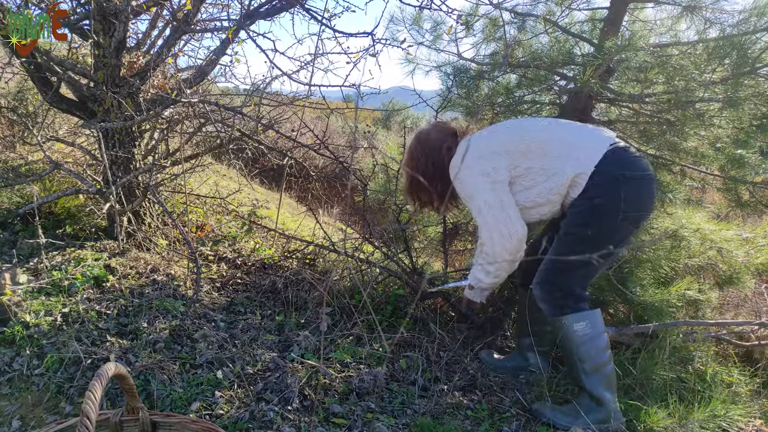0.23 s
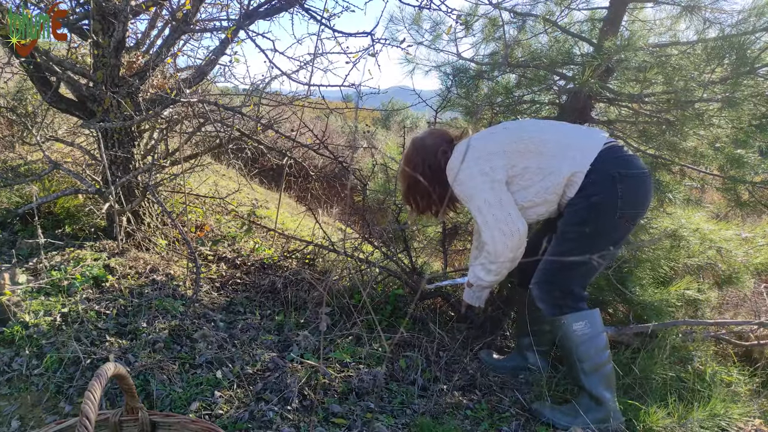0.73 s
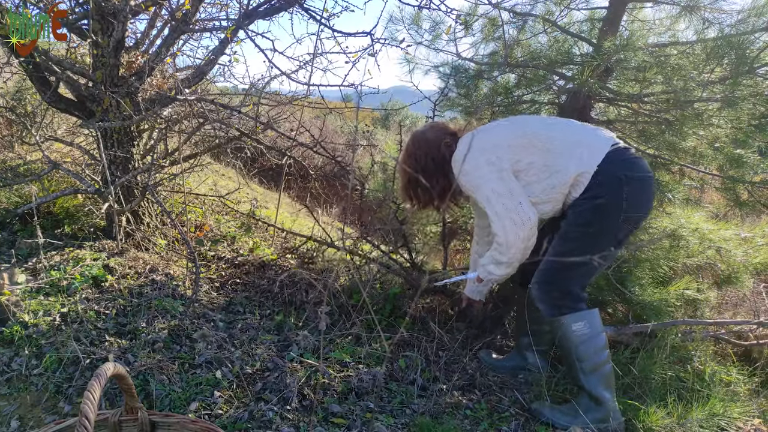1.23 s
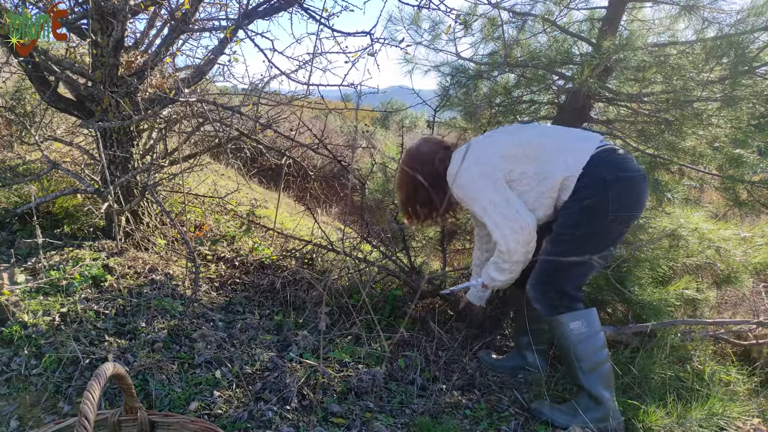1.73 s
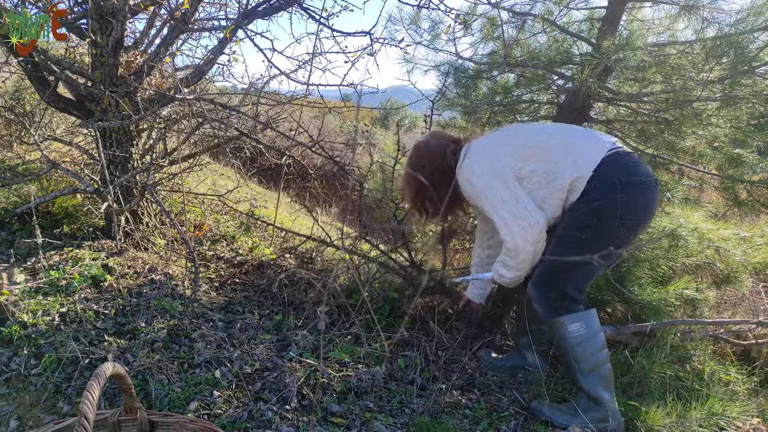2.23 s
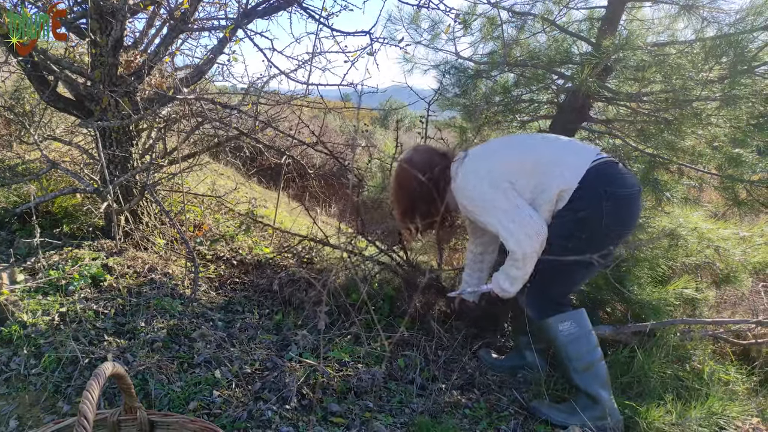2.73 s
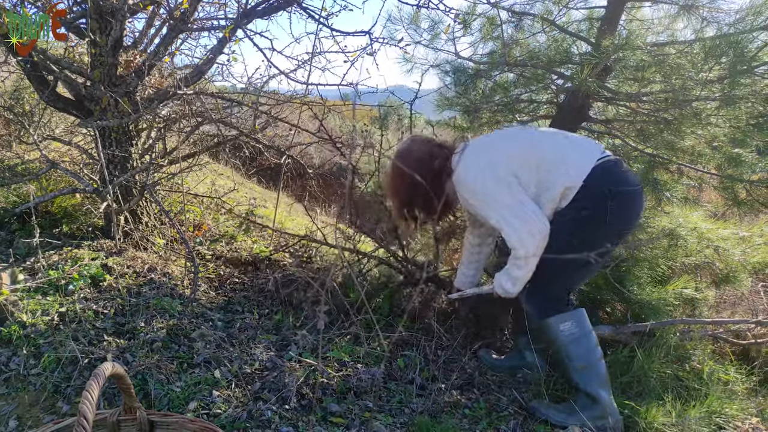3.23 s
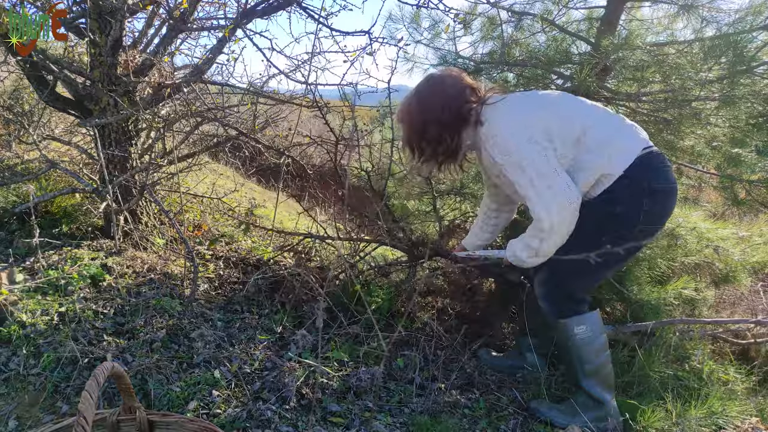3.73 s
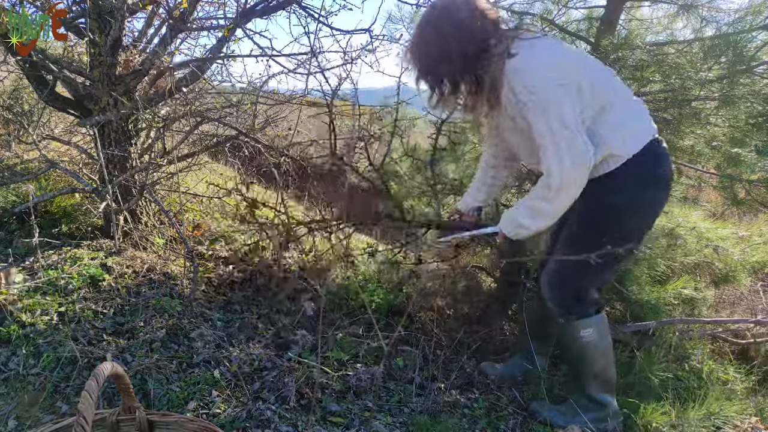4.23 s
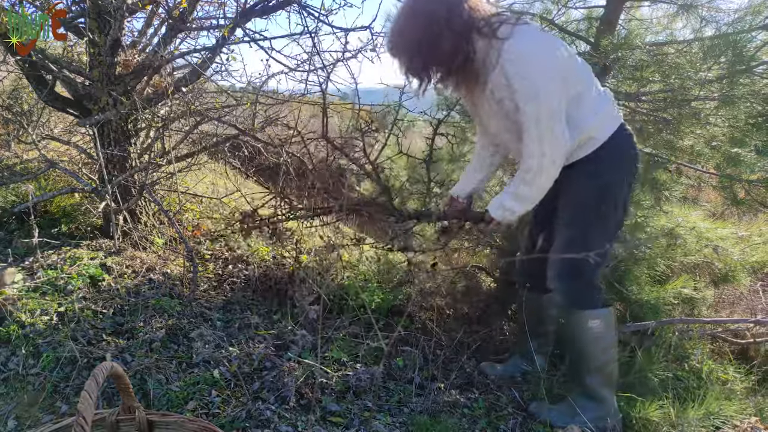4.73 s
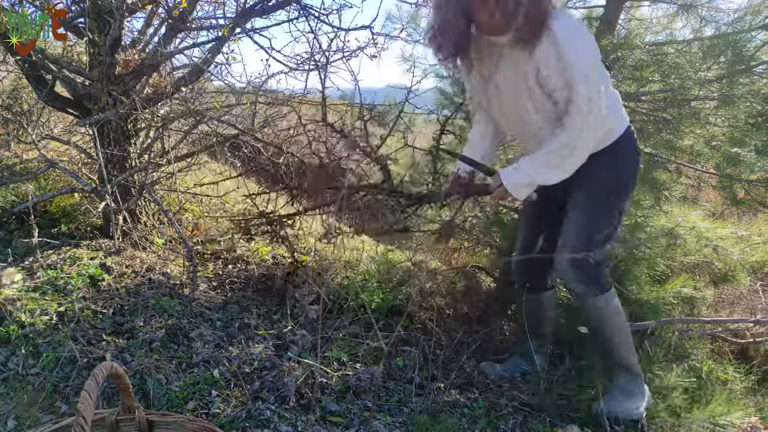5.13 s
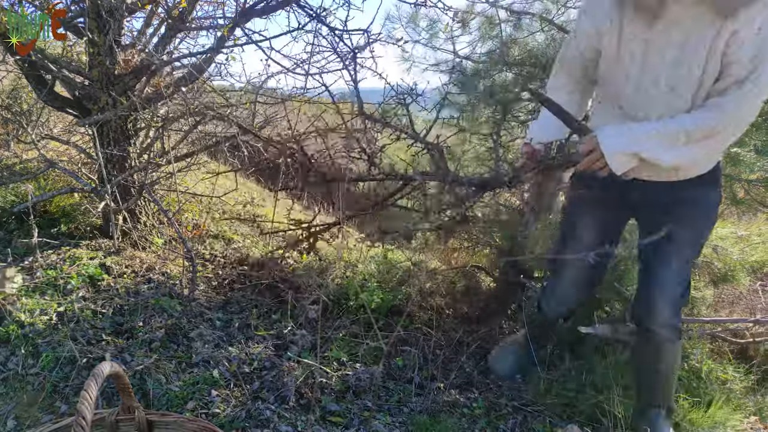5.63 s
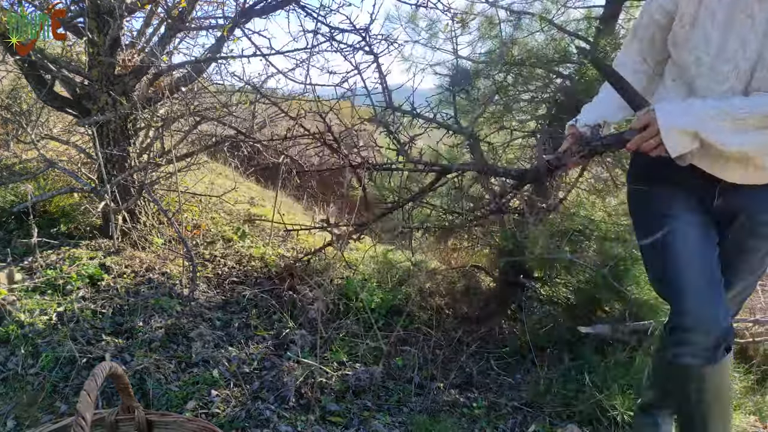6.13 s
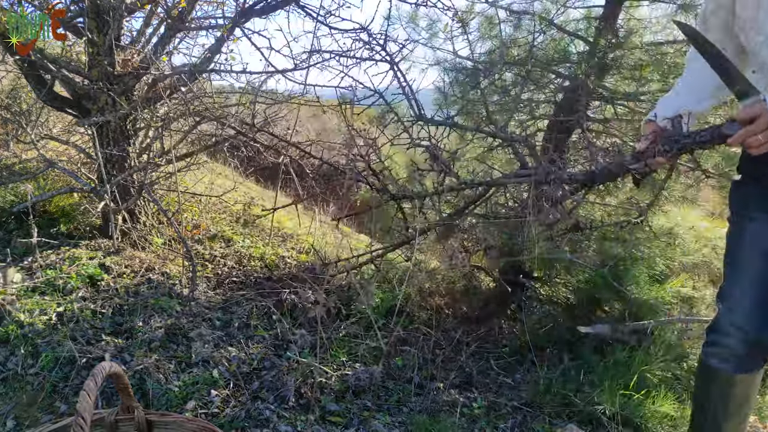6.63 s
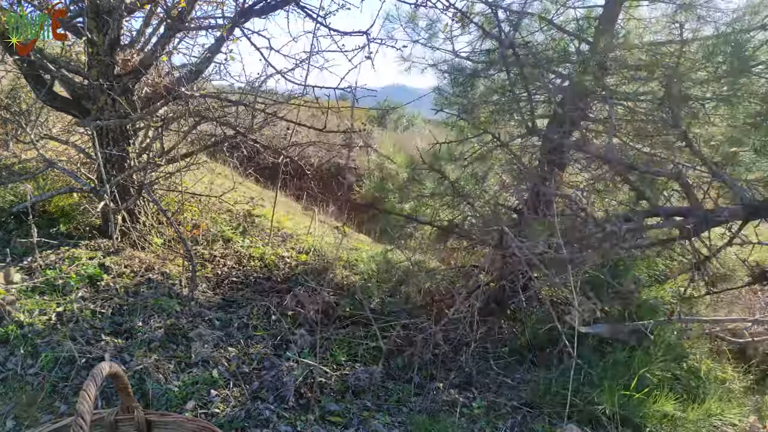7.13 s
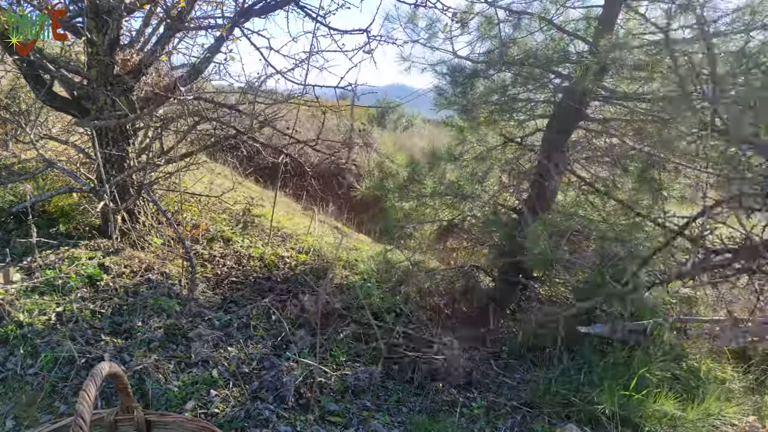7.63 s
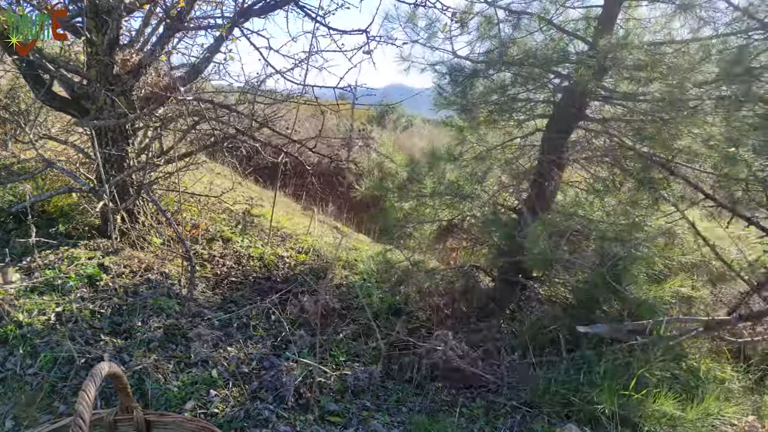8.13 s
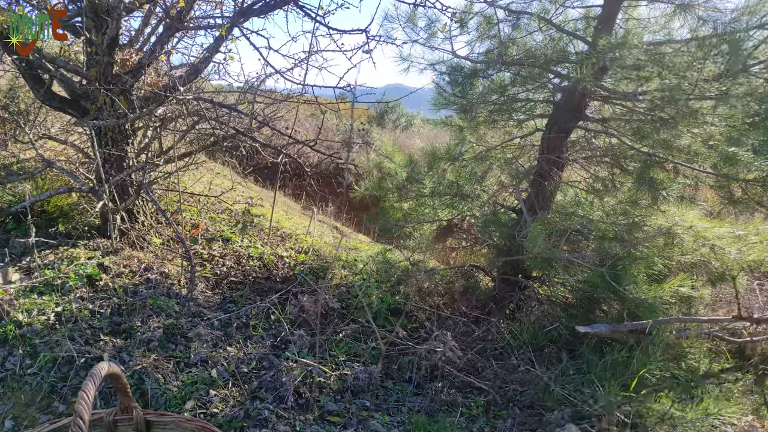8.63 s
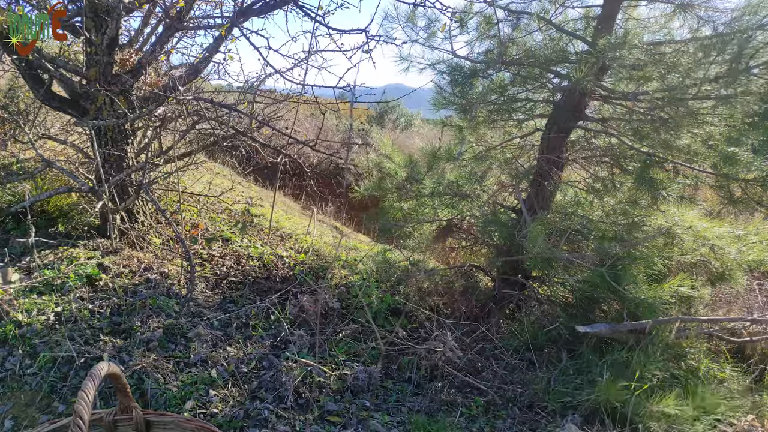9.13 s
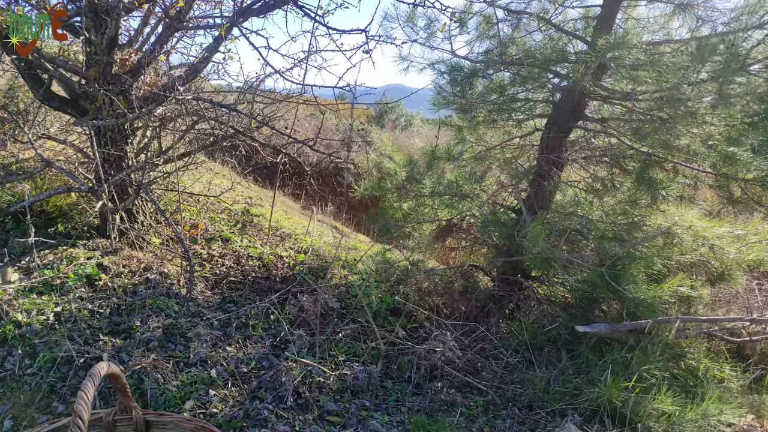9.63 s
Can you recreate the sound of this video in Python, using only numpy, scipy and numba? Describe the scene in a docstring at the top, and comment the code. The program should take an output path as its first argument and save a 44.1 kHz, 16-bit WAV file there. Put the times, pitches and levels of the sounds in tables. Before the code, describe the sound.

In a quiet open pine wood with faint low wind, a small bird ticks on the left while dry twigs rustle and snap softly. After three seconds a dead branch is pulled free with dense bright crackling, sharp snaps, wood knocks and boot thuds, dragged past a close stereo microphone, then thinning to near silence.

```python
"""Still air and slow wind in a quiet pine wood, with a faint dry rustle at the stereo microphone.
A dead branch is worked loose from brush and dragged off past it: chance cracks make the rustle, resonances
the snapping twigs, sagging sines and ringing noise the wood knocks and boot thuds. On the left a small bird
ticks in falling chirps; another whistles twice in thin sines. The microphone ports ring near 7 kHz."""
import sys
import numpy as np
from scipy import signal
from scipy.fft import rfft, irfft, next_fast_len
from scipy.io import wavfile
from scipy.ndimage import uniform_filter1d, map_coordinates
from numba import njit

SR = 44100
rng = np.random.default_rng(int(sys.argv[2]) if len(sys.argv) > 2 else 0)


def inscribe(sig):
    """Save sig as 16-bit PCM at rate SR to the path in sys.argv[1].

    A 1-D sig is mono; a 2-D sig holds one channel per row.
    Samples are clipped to [-1, 1] before scaling.
    """
    pcm = np.round(np.clip(np.atleast_2d(sig).T, -1, 1) * 32767)
    wavfile.write(sys.argv[1], SR, pcm.astype(np.int16))


N = 435266


def undb(db):
    """Decibels to gain."""
    return 10 ** (np.asarray(db) / 20)


def unit(x):
    """Scale to rms 1 over all channels together."""
    return x / np.sqrt(np.mean(x ** 2))


def sides(db, pan_db):
    """Left and right gains for a level and a left minus right difference."""
    return undb([db + pan_db / 2, db - pan_db / 2])


def along(table, hz):
    """Read (frequency [Hz], value) points on a log-frequency axis."""
    points = np.array(table)
    return np.interp(np.log(hz + 1), np.log(points[:, 0]), points[:, 1])


def colour(x, table, lo_hz, hi_hz):
    """Filter to a spectrum of (Hz, dB) points between two soft edges; white noise keeps its rms."""
    size = next_fast_len(N)
    hz = np.arange(size // 2 + 1) * SR / size
    edges = np.sqrt((1 + (lo_hz / (hz + 1)) ** 8) * (1 + (hz / hi_hz) ** 8))
    gain = undb(along(table, hz)) / edges
    return irfft(rfft(x, size) * unit(gain), size)[..., :N]


def pair(table):
    """Two white noises, as alike left and right at each frequency as the table says."""
    size = next_fast_len(N)
    alike = np.clip(along(table, np.arange(size // 2 + 1) * SR / size), -1, 1)
    mid, side = rfft(rng.standard_normal((2, size))) * np.sqrt([(1 + alike) / 2, (1 - alike) / 2])
    return irfft([mid + side, mid - side], size)[:, :N]


def fade(x, t60):
    """Each impulse leaves an exponential tail that falls 60 dB in t60 seconds."""
    return signal.lfilter([1], [1, -np.exp(-np.log(1000) / (t60 * SR))], x)


def walk(rate):
    """Random levels of rms 1, held 1 / rate s and slewed twice."""
    hold = int(SR / rate)
    steps = np.repeat(rng.standard_normal(N // hold + 1), hold)
    return unit(uniform_filter1d(uniform_filter1d(steps, hold), hold)[:N])


def add(track, s, sound):
    """Mix a short sound in at s seconds."""
    i = int(s * SR)
    track[:, i:i + sound.shape[1]] += sound[:, :N - i]


def chance_db(draw, spread_db, most):
    """Chance levels above the smallest, most of them small, capped at most times the spread."""
    return np.minimum(-spread_db * np.log(1 - draw), most * spread_db)


def ring(x, hz, sharpness):
    """One resonance driven by x."""
    return signal.lfilter(*signal.iirpeak(hz, max(sharpness, .3), fs=SR), x)


def knell(t, hz, t60):
    """A mode struck at 1 ms, dying away exponentially."""
    return np.sin(2 * np.pi * hz * (t - .001)) * (t > .001) * undb(-60 * t / t60)


# Spectrum of the still air: (frequency [Hz], relative level [dB])
AIR_SPECTRUM = [(30, 0), (56, -5), (120, -10.5), (277, -13.5), (659, -22.5), (840, -22.5), (1020, -28.5),
                (3920, -31), (7310, -37), (8830, -35), (10700, -53), (16000, -49)]
AIR_DB, AIR_LOW_HZ = -66.5, 45


def still_air():
    """Still air in the pines: wide coloured noise whose level wanders slightly."""
    air = pair([(40, 0.25), (150, 0.5), (3000, 0.)])
    air = air * undb(1.2 * walk(3.2))
    return colour(air, AIR_SPECTRUM, AIR_LOW_HZ, SR) * sides(AIR_DB, 4.2)[:, None]


# Slow wind on the microphone ports, before its random wavering: (time [s], level [dB])
WIND_LEVELS = [(0, -61.5), (1.0, -62.5), (2.0, -57), (3.0, -56.5), (3.7, -59.5), (4.8, -65), (5.5, -61),
               (6.3, -58), (7.0, -64), (7.7, -63), (9.87, -61.5)]


def gusts():
    """Wind on the ports: very low noise, independent left and right, wavering in level."""
    rumble = colour(rng.standard_normal((2, N)), [(8, 5.5), (40, -10.0), (120, -25.5)], 9, 80)
    level_db = np.interp(np.arange(N) / SR, *np.transpose(WIND_LEVELS))
    return rumble * undb(4.1 * walk(5.2) + level_db) * sides(0, 4.9)[:, None]


def crackle(rate, spread_db, t60, scatter_db, patchy_db, hush):
    """Envelope of many cracks at chance moments and places: most small, a few large, over a blur of far ones."""
    moment, size, place = rng.random((3, N))
    size_db = chance_db(size, spread_db, 4)
    cracks = (moment < rate / SR) * sides(size_db, scatter_db * (2 * place - 1))
    return unit((unit(fade(cracks, t60)) + hush) * undb(patchy_db * walk(22)))


@njit
def grains(start, length, a, b, size, lag, count):
    """Each grain is a mode struck once; it reaches the left port lag samples after the right."""
    out = np.zeros((2, count + 2048))
    for k in range(len(start)):
        now, last = size[k], 0.
        for i in range(length[k]):
            out[0, start[k] + lag[k] + i] += now
            out[1, start[k] + i] += now
            now, last = a[k] * now - b[k] * last, now
    return out


def ticking(rate, spread_db, sharpness, count):
    """Lone twig ticks: every twig rings briefly at a pitch of its own, from its own direction."""
    when, size, loud, side = rng.random((int(rate * N / SR), 4)).T
    start = 8 + (when * (N - 8)).astype(int)
    hz = 1200 * 10 ** size
    sharp = np.maximum(sharpness * undb(5 * rng.standard_normal(len(hz))), 2)
    # neighbouring sizes of twig come and go together, nine times a second
    bunches = rng.standard_normal((count, 9 * N // SR))
    spots = [size * (count - 1), when * (bunches.shape[1] - 1)]
    bunch_db = 4.2 * map_coordinates(bunches, spots, order=1)
    gain = undb(bunch_db + chance_db(loud, spread_db, 3)) * hz / np.sqrt(sharp)
    # phase step and damping per sample
    step, damp = 2 * np.pi * hz / SR, np.pi * hz / sharp / SR
    length = np.minimum(6 / damp, 2000).astype(int)
    lag = (16 * side - 6).astype(int)
    a, b = 2 * np.exp(-damp) * np.cos(step), np.exp(-2 * damp)
    return unit(grains(start, length, a, b, gain * np.sin(step), lag, N)[:, :N])


def stray(rate, spread_db):
    """Lone sharp cracks at chance moments and sides."""
    when, loud, side = rng.random((int(rate * N / SR), 3)).T
    out, i = np.zeros((2, N + 8)), (when * N).astype(int)
    arrivals = [i + (8 * side).astype(int), i + 2]  # left, right [samples]
    out[[[0], [1]], arrivals] = sides(chance_db(loud, spread_db, 3), 8 * (.5 - side))
    return out[:, :N]


# Modes of the microphone ports: (frequency [Hz], gain, sharpness)
PORT_MODES = [(7160, 2.6, 4.5), (8700, 0.8, 5.0), (5400, 0.4, 3.0)]


def ports(clicks):
    """A sharp crack starts at once and dies away in the ring of the microphone ports."""
    return sum(gain * ring(ring(clicks, hz, sharpness), hz, sharpness) for hz, gain, sharpness in PORT_MODES)


# Tugs at the branch, each a swell that builds up and lets go:
# (time of crest [s], treble rise [dB], middle rise [dB], build-up [s])
TUG_SWELLS = [(1.05, 12, 15.5, 0.32), (1.36, 16.5, 11.5, 0.19), (2.1, 9, 10, 0.2), (2.36, 13, 10.5, 0.17),
              (2.8, 7.5, 10.5, 0.4), (3.13, 5, 11, 0.16), (4.241, 12.5, 14, 0.34), (4.48, 6, 8.5, 0.21),
              (4.72, -2.5, 8.5, 0.12), (4.97, -7, 6.5, 0.075), (5.2, 2.5, 2, 0.091), (5.4, 2, -1, 0.068),
              (5.53, 4, -0.5, 0.066), (5.64, 5, 5.5, 0.027), (6.072, -0.5, 9, 0.14), (6.4, 1.5, 4, 0.8),
              (7.106, 8, 13, 0.13), (7.25, -5, 2.5, 0.052), (7.531, 6, 5, 0.14), (7.719, 7.5, 4, 0.17),
              (8.3, 5.5, 11.5, 0.38), (8.5, 5, 4, 0.17), (8.64, 4, 6.5, 0.08), (9.0, 6, 5.5, 0.26),
              (9.74, 16, 15, 0.066)]
LET_GO_S, LET_GO_SHARE = 0.047, 0.35  # the fall lasts this long plus a share of the build-up


def tugs(t):
    """Treble and middle rise of all tugs (dB): raised-cosine swells added together."""
    coarse_t = t[::44]
    out = np.zeros((2, len(coarse_t)))
    for s, db, middle_db, build_s in TUG_SWELLS:
        fall_s = LET_GO_S + LET_GO_SHARE * build_s
        gone = np.where(coarse_t < s, (s - coarse_t) / build_s, (coarse_t - s) / fall_s)
        swell = np.cos(np.pi / 2 * np.minimum(np.abs(gone), 1)) ** 2
        out += np.outer([db, middle_db], swell)
    return [np.interp(t, coarse_t, rise_db) for rise_db in out]


# Steady drag between the tugs: (time [s], treble rustle level [dB], middle crackle level [dB],
# bass scrape level [dB], treble left minus right [dB])
STEADY_DRAG = [(0.0, -70.5, -81, -75, -5), (0.45, -78.5, -83, -74.5, -10), (0.8, -71, -82.5, -74, -6.5),
               (1.2, -64, -77, -84, -4.5), (1.56, -73.5, -79, -75, -9), (1.9, -63.5, -74, -74, -2),
               (2.2, -62, -74, -75.5, -4.5), (2.5, -62, -78.5, -76, -5), (3.0, -53, -72.5, -70, -2.5),
               (3.3, -49, -60, -63.5, -4), (3.8, -41.5, -54, -57, -4.5), (4.62, -48.5, -62.5, -63.5, -5.5),
               (5.06, -47, -58.5, -61, -5.5), (5.3, -39, -44, -53, -3.5), (5.68, -36.5, -48.5, -48.5, -4.5),
               (5.93, -46, -55.5, -58.5, -4), (6.8, -42.5, -55, -57.5, -5), (7.3, -39.5, -49, -51, -4.5),
               (7.92, -46.5, -59, -60, -2), (9.0, -48, -64.5, -64, 1), (9.5, -59, -73, -73, 2.5),
               (9.87, -72.5, -80, -74, 2)]
# Spectrum of the cracks through the ringing ports: (frequency [Hz], relative level [dB])
BRUSH_SPECTRUM = [(59, -48), (100, -33), (171, -14.5), (368, -14.5), (670, -14.5), (1410, -15), (2680, -11),
                  (3700, -17.5), (4680, -16), (6180, -9), (7170, 1), (8400, -8), (9300, -15.5),
                  (9800, -22.5), (11500, -20), (15100, -16), (16500, -16)]
# How alike left and right are: (frequency [Hz], likeness, limited to -1..1)
LIKENESS = [(60, -1.8), (300, 0.7), (700, 0.45), (1400, 0.05), (3100, 0.027), (7000, 0.022)]
BASS_HZ, TREBLE_HZ, TOP_BAND_HZ = 1007, 4630, 10830  # edges between bass, middle, treble and top
MIDDLE_PAN_DB, BASS_PAN_DB = 0, 3.5  # left minus right
BASS_FOLLOWS = 0.71  # share of the middle's tug rise


def brush():
    """Leaves and thin twigs crack in the treble, thicker twigs in the middle, the branch scrapes in the bass."""
    s, *columns = np.transpose(STEADY_DRAG)
    t = np.arange(N) / SR
    db, middle_db, bass_db, pan_db = (np.interp(t, s, c) for c in columns)
    rise_db, middle_rise_db = tugs(t)
    db = db + rise_db
    middle_db = middle_db + middle_rise_db
    bass_db = bass_db + BASS_FOLLOWS * middle_rise_db

    snap_treble, clicks, snap_middle = snaps()
    fine = crackle(rate=1300.0, spread_db=7.5, t60=0.03, scatter_db=9.0, patchy_db=2, hush=0.6)
    coarse = crackle(rate=250., spread_db=3.5, t60=0.04, scatter_db=9.0, patchy_db=3, hush=0.4)
    scrape = crackle(rate=120.0, spread_db=4.5, t60=0.07, scatter_db=2.0, patchy_db=1.5, hush=0.5)
    noise = pair(LIKENESS)
    ticks = ticking(rate=2200., spread_db=2.0, sharpness=57.0, count=9)
    clicks = clicks + sides(db + 21, pan_db) * stray(rate=60., spread_db=3.0)

    bunched = .75 * ticks * undb(2.5 * walk(15))
    treble = sides(db, pan_db) * (1.11 * fine * noise + bunched) + snap_treble * noise
    # thin twigs are heard in the middle too
    middle = sides(middle_db, MIDDLE_PAN_DB) * ((0.14 * fine + 0.87 * coarse) * noise + 0.53 * ticks)
    bass = sides(bass_db, BASS_PAN_DB) * (0.097 * coarse + 0.73 * scrape) * noise

    # the highest treble flickers on its own
    top = colour(treble * undb(3.4 * walk(33) - 21.5), BRUSH_SPECTRUM, TOP_BAND_HZ, SR)
    treble = colour(treble, BRUSH_SPECTRUM, TREBLE_HZ, TOP_BAND_HZ)
    middle = colour(middle, BRUSH_SPECTRUM, BASS_HZ, TREBLE_HZ)
    bass = colour(bass, BRUSH_SPECTRUM, 123, BASS_HZ)
    return top + ports(clicks) + treble + middle + bass + snap_middle


# Twig breaks: (time [s], nominal level [dB], middle minus treble [dB], twig pitch [Hz],
# settling splinters minus first burst, nominal [dB], treble left minus right [dB])
TWIG_BREAKS = [(0.081, -42, -16, 3140, -22, -5), (0.836, -43, -30, 4910, -9, 6),
               (0.978, -51, -30, 5000, -25, -2), (1.0112, -43, -24, 3800, -28, -4),
               (1.0665, -34.5, -19, 4580, -5, -8), (1.3438, -37, -26, 5900, -6, -6),
               (1.407, -28.5, -27, 2390, -12, -4), (1.7185, -55, -10, 2700, -25, 0),
               (1.9513, -31, -28, 3520, -16, -10), (2.013, -35.5, -14.5, 3800, -15, -8),
               (2.365, -35, -11.5, 4570, -12, -5), (2.519, -31.5, -17.5, 4300, -6.5, -3),
               (2.716, -31, -27, 4000, -26, -7), (2.730, -35, -22, 5400, -16, -7),
               (2.742, -27, -30, 5600, -28, -5), (2.7782, -35, -26, 5500, -11, -4),
               (3.0195, -32.5, -24, 4500, -23, -5), (3.0437, -37, -16, 4610, -17, -4),
               (3.1374, -35, -6, 2350, -12, -2), (3.221, -40, -16, 2220, 4.5, -2),
               (3.2673, -43, -11, 3500, -15, -1), (3.5543, -38, -15, 2390, 5, -2),
               (3.596, -42, -9, 1670, -10, 0), (3.78, -32, -24.5, 1730, 7, -2),
               (3.3667, -28, -22.5, 2240, -23, 4), (3.697, -31, -12.5, 1950, -6, -1),
               (3.825, -21.5, -17, 4500, -24, -5), (3.8985, -20, -26, 4400, -22, -1),
               (3.997, -19.5, -15, 4530, -13, -10), (4.045, -24.5, -10, 4930, -12, -3),
               (4.1002, -30, -26, 4370, -10, 0), (4.123, -16, -37, 2560, -31, -5),
               (4.2568, -17, -32, 4290, -5, -7), (4.491, -22, -13.5, 4340, -14, -6),
               (4.6595, -24.5, -18, 5200, -7, 0), (4.6876, -11, -14.5, 2900, -22, 0),
               (4.685, -8.5, -14, 5300, -11, -6), (4.694, -21.5, -19, 1680, -20, 2),
               (4.9256, -21.5, -15, 4300, -23, -6), (4.929, -21, -26, 3040, -25, 0),
               (4.942, -24, -27, 3900, -6, -5), (4.9665, -22, -24, 3750, -22, -3),
               (4.9685, -22, -26, 3750, -24, -4), (4.983, -25.5, -9.5, 3900, -12, -5),
               (4.9942, -17, -25, 5000, -22, 1), (4.9966, -19.5, -20, 4800, -16, -4),
               (5.0013, -28, -15, 2540, -11, 1), (5.127, -42, -10, 4240, -12, -4),
               (5.165, -17.5, -11, 3430, -9, -7), (5.371, -25, -33, 3340, 4, -4),
               (5.428, -31, -9.5, 4160, 5, -2), (5.5169, -24, -24, 2890, 3, 1),
               (5.631, -24, -11.5, 2470, -10, -3), (5.925, -30.5, -12.5, 1370, -5, 0),
               (5.997, -23.5, -15, 4500, -26, -1), (6.0241, -20.5, -19, 2400, -9, -4),
               (6.028, -15, -24, 2360, -15, 6), (6.033, -22, -18, 2400, -16, 7),
               (6.0355, -12, -25, 5700, -15, -7), (6.051, -18, -24, 5700, -22, 3),
               (6.0793, -21, -24, 4500, 2, -2), (6.0945, -26, -17, 3400, -12, -6),
               (6.113, -25, -26, 5360, -12, -1), (6.4922, -12, -22.5, 2580, -12, -4),
               (6.4977, -17, -10.5, 5340, -18, -2), (6.699, -26, -34, 4460, -2, -3),
               (6.833, -23, -15, 2540, -5, 1), (6.8363, -13.5, -15, 5600, -23, -1),
               (6.912, -14.5, -19, 2400, -3.5, 0), (6.9146, -15, -14.5, 4160, -19, -3),
               (7.016, -22, -31, 2300, -9, -5.0), (7.0609, -21, -30, 1960, 6, -3.0),
               (7.0813, -16.5, -19, 4020, 4.5, 0), (7.2122, -22.5, -19, 5100, -2, -8),
               (7.223, -24, -22, 4940, -23, 0), (7.227, -22, -21, 4500, -20, -5),
               (7.236, -23.5, -22, 3000, -10, 3), (7.282, -26, -24, 3000, -18, -1),
               (7.255, -6, -33, 4040, -24, 0), (7.2585, -21, -28, 4200, -14, 0),
               (7.2625, -23, -24, 4200, -12, -3), (7.4715, -25, -27, 4490, -19, -5),
               (7.5, -33, -12, 5300, -14, -3), (7.979, -39, -7, 4220, -18, -2),
               (8.815, -34, -31, 4500, -15, -7), (8.9083, -30, -10.5, 5130, -6, -2),
               (7.865, -34.5, -13.5, 2250, -13, 0), (8.281, -24, -21, 3900, 0, -6),
               (8.4646, -21, -23, 4900, -12, 2), (8.62, -9.5, -40, 3100, -22, -9),
               (8.6224, -24, -20, 5400, -14, -1), (8.8450, -17, -39, 2120, -22, -6),
               (9.037, -20.5, -21, 3860, -4.5, -2), (9.1416, -35, -32, 3280, 3, 1.5),
               (9.297, -32.5, -13, 4550, -9, 7), (9.611, -41, -28, 4400, -3, 2),
               (9.7098, -44, -9.5, 3920, -8, 5), (9.833, -45.5, -20, 4470, -13, 1)]
VOLLEY_S, THICK_DB = .0023, -18  # a break with this much middle has this volley time
THICK_SLOWS = .3  # thin bright twigs part faster
TIP_HZ, TIP_DB, TIP_FOLLOWS = 5300, -7, .8  # the tip stands out more from a twig with less middle


def snaps():
    """Treble envelope, clicks and middle sound: a twig clicks, fibres part in a volley, splinters settle."""
    clicks = np.zeros((2, N + 3))
    treble, middle = np.zeros((2, N)), np.zeros((2, N))
    t = np.arange(SR // 7) / SR
    fibres = rng.standard_normal((len(TWIG_BREAKS), 2, len(t)))
    for (s, db, middle_db, hz, tail_db, pan_db), (ragged, push) in zip(TWIG_BREAKS, fibres):
        volley_s = VOLLEY_S * undb(THICK_SLOWS * (middle_db - THICK_DB))
        volley = t / volley_s * np.exp((1 - (t / volley_s) ** 2) / 2)
        splinters = np.minimum(t / 0.011, 1) * undb(tail_db - 60 * t / 0.18)
        # both are ragged in steps of 64 samples
        shape = (volley + splinters) * undb(2.0 * np.repeat(ragged, 64)[:len(t)])
        add(treble, s - .0005, np.outer(sides(db - 10.5, pan_db), shape))
        clicks[[0, 1], int(s * SR) + np.array([12, 10])] += sides(db + 16, pan_db)
        # the twig rings at its own pitch and, more broadly, over the whole middle
        twig = shape * (1.53 * unit(ring(push, hz, 7.6)) + 0.56 * unit(ring(push, 2200, 1.0)))
        # the first crack rings the twig and its thin tip cleanly
        tip = undb(TIP_DB - TIP_FOLLOWS * middle_db) * knell(t, TIP_HZ * (1 + .06 * push[0]), 0.012)
        twig = twig + tip + 0.5 * knell(t, hz, 0.02)
        gains = sides(db - 3.5 + middle_db, 0.69 * pan_db + 0.5)
        add(middle, s - .001, gains[:, None] * [np.roll(twig, 3), twig])
    return treble, clicks[:, :N], middle


# Ticking bird: (time [s], nominal level [dB], left minus right [dB])
BIRD_TICKS = [(0.49, -45, 10), (0.515, -40, 5), (0.6644, -44, 10), (0.692, -42, 10), (1.6722, -40.5, 3),
              (1.701, -36.5, 7), (1.81, -40.5, 2), (1.842, -35.5, 3)]
PORT_HZ = 7030
RASP = .3  # depth of pitch flutter, before smoothing


def ticking_bird():
    """Ticks drop steeply in pitch, ring the ports and smear among the trunks."""
    ticks, t = np.zeros((2, N)), np.arange(SR // 100) / SR
    for (s, db, pan_db), rasp in zip(BIRD_TICKS, rng.standard_normal((len(BIRD_TICKS), len(t)))):
        flutter = 1 + RASP * uniform_filter1d(rasp, size=30)
        drop_hz = (4000 + 3900 * np.exp(-t / 0.0034)) * flutter
        envelope = np.minimum(t / 0.00065, 1) * undb(-60 * t / 0.027)
        tick = np.sin(2 * np.pi * np.cumsum(drop_hz) / SR) * envelope
        add(ticks, s, np.outer(sides(db, pan_db), 0.25 * tick + ring(tick, PORT_HZ, 7.0)))
    u = np.arange(SR // 8) / SR
    trunks = rng.standard_normal((2, len(u))) * undb(-19 - 60 * u / 0.06)
    return ticks + signal.oaconvolve(ticks, trunks, axes=1)[:, :N]


# Whistling bird, one list a call, before its wavering: (time [s], pitch [Hz], level [dB])
BIRD_WHISTLES = [
    [(1.846, 4180, -68), (1.89, 4500, -66), (1.915, 4900, -64), (1.932, 5060, -67), (1.957, 4450, -67)],
    [(9.57, 4250, -67), (9.595, 4750, -60), (9.622, 5200, -62), (9.655, 4500, -72)],
]


def whistling_bird():
    """Whistles are thin sines gliding through the pitch points, wavering in pitch and level."""
    out = np.zeros((2, N))
    for call in BIRD_WHISTLES:
        s, hz, db = np.transpose(call)
        u = np.arange(s[0], s[-1], 1 / SR)
        glide_hz = uniform_filter1d(np.interp(u, s, hz), size=500) + 60 * walk(200)[:len(u)]
        tone = np.sin(2 * np.pi * np.cumsum(glide_hz) / SR)
        tone = tone * signal.windows.tukey(len(u), .15) * undb(4 * walk(160)[:len(u)])
        add(out, s[0], sides(np.interp(u, s, db), 1.5) * tone)
    return out


# Wood knocks and footfalls: (time [s], nominal level [dB],
# nominal pitch [Hz], sagging from 1.24 to 0.55 times it, nominal soil rumble minus knock [dB])
BLOWS = [(3.139, -32, 530, -23), (3.94, -34, 402, -24), (4.121, -27, 446, -18.5), (4.188, -34.5, 740, -16),
         (4.355, -33.5, 458, -22), (4.492, -40, 570, -14), (4.688, -50, 766, -7), (4.93, -37, 654, -32),
         (5.169, -27.5, 790, -28), (5.382, -42, 423, -4), (5.527, -44, 273, -12), (5.68, -36, 730, -16),
         (5.925, -34, 470, -33), (5.994, -37, 537, -21), (6.128, -26.5, 812, -11.5),
         (6.499, -35.5, 705, -13), (6.847, -33.5, 201, -12.5), (6.919, -31.5, 720, -14),
         (7.015, -36, 259, -11), (7.088, -24, 760, -21.5), (7.439, -38.5, 199, -11), (8.433, -39, 490, -17),
         (8.634, -32.5, 590, -6), (8.788, -30, 503, -22), (8.893, -39, 517, -13.5), (9.327, -42, 585, -18),
         (9.363, -40.5, 700, -14)]


def knocks():
    """A blow rings the wood for a few cycles that sag in pitch; the soil rumbles longer."""
    out, t = np.zeros((2, N)), np.arange(SR // 4) / SR
    for (s, db, hz, soil_db), push in zip(BLOWS, rng.standard_normal((len(BLOWS), len(t)))):
        sag_hz = hz * (0.554 + 0.685 * np.exp(-t / 0.0065))
        wood = np.sin(2 * np.pi * np.cumsum(sag_hz) / SR) * t / 0.0066 * np.exp(1 - t / 0.0023)
        soil = unit(ring(push, 213, 1.5)) + 0.3 * unit(ring(ring(push, 450, 0.99), 450, 0.99))
        soil = soil * np.minimum(t / 0.012, 1) * undb(soil_db - 60 * t / 0.25)
        add(out, s, np.outer(sides(db, BASS_PAN_DB), wood + soil))
    return out


def scene():
    """Everything at the two ports."""
    return still_air() + gusts() + brush() + ticking_bird() + whistling_bird() + knocks()


TOP_HZ = 16000
CEILING = .6  # full scale is 1


def record(dry):
    """The microphone's recorder rounds the loudest peaks and cuts the top."""
    rounded = CEILING * np.tanh(dry / CEILING)
    return signal.sosfilt(signal.ellip(10, .2, 75, TOP_HZ, fs=SR, output="sos"), rounded)


dry = scene()
out = record(dry)
inscribe(out)
```